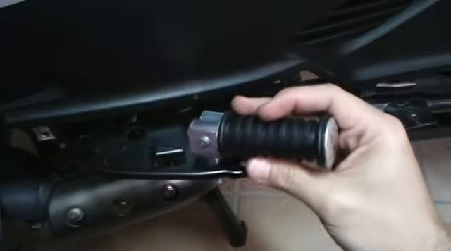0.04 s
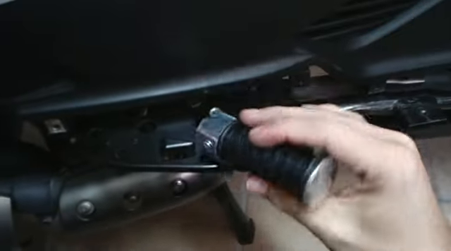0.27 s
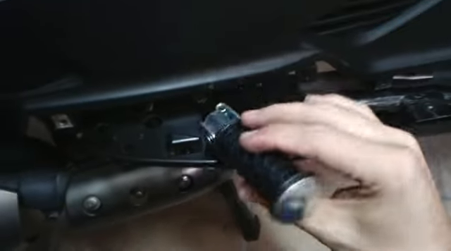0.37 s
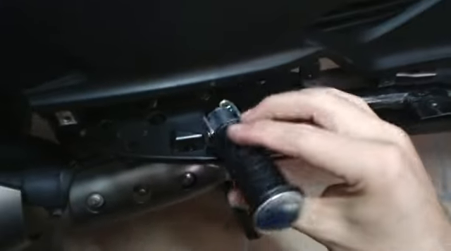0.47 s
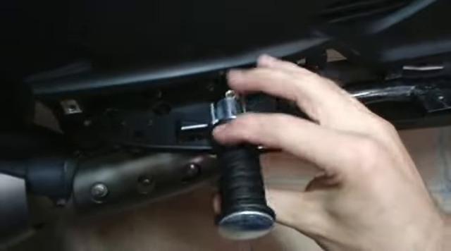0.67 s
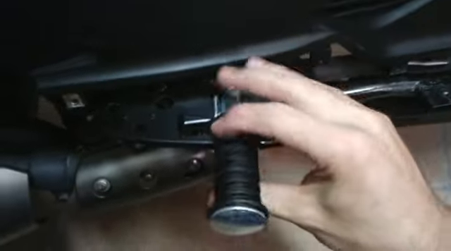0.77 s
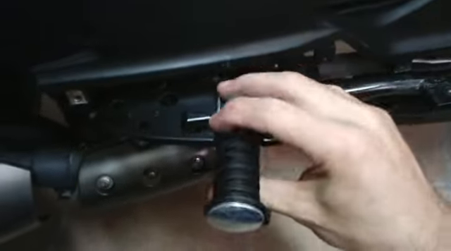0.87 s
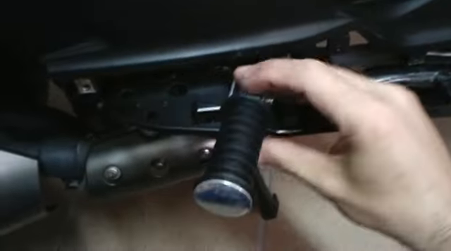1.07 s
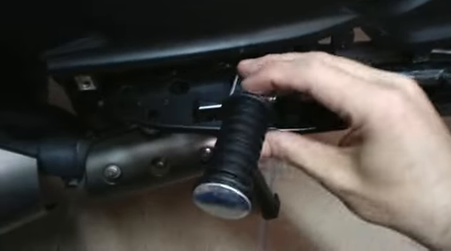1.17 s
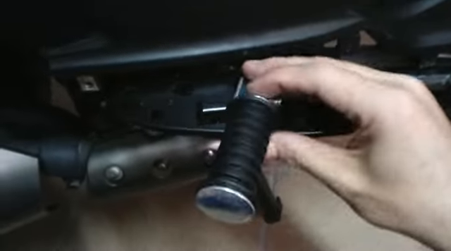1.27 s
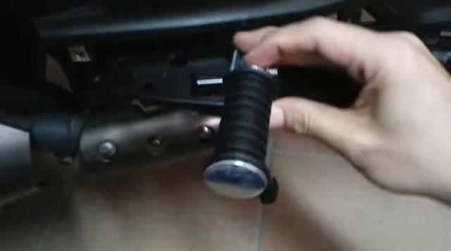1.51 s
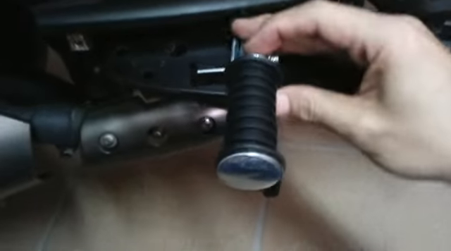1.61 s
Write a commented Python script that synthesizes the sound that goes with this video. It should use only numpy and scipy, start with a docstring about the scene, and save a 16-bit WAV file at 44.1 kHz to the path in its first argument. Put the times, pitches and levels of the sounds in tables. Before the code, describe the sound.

A hand folds out a metal footpeg with a sharp ringing snap and smaller clicks.

```python
"""Scooter footpeg folding out

A small, hard-walled room, one microphone close to the peg, faint hiss behind. A hand swings the
metal peg out: after a thin squeak it snaps against its stop and rings into the room. Then it
clicks and knocks in its hinge as the fingers shift and rub on it."""
import sys
import numpy as np
from scipy import signal
from scipy.fft import rfft, irfft
from scipy.io import wavfile
from scipy.ndimage import uniform_filter1d

SR = 44100
rng = np.random.default_rng(int(sys.argv[2]) if len(sys.argv) > 2 else 0)


def store_wav(level_fs):
    """Save 16-bit WAV to argv[1]."""
    pcm = np.round(np.clip(np.atleast_2d(level_fs), -1, 1) * 32767)
    wavfile.write(sys.argv[1], SR, pcm.T.astype(np.int16))


N = 72765


def amp(db):
    """Decibels to gain."""
    return 10 ** (np.asarray(db) / 20)


def read(points, hz):
    """Interpolates (frequency, value) rows on a logarithmic frequency axis."""
    f, value = np.transpose(points)
    return np.interp(np.log(hz + 1), np.log(f + 1), value)


def add(mix, start_s, sound):
    """Mixes a sound in at a time."""
    part = mix[max(round(start_s * SR), 0):][:len(sound)]
    part += sound[:len(part)]


def axes():
    """Times and frequencies of a one-second sound."""
    return np.arange(SR) / SR, np.fft.rfftfreq(SR, 1 / SR)


def bell(hz, centre, width):
    """A resonance curve of height one."""
    return 1 / (1 + ((hz - centre) / width) ** 2)


def fade(t, t60):
    """Falls by 60 dB in t60."""
    return amp(-60 * t / t60)


def coloured(white, db):
    """Gives white noise of unit power a spectrum in dB per kHz."""
    return irfft(rfft(white) * amp(db), len(white)) * np.sqrt(SR / 2000)


def tick(db):
    """A single minimum-phase impulse with the given spectrum in dB per kHz."""
    cepstrum = irfft(np.log(amp(db)))
    cepstrum[1:SR // 2] *= 2
    cepstrum[SR // 2 + 1:] = 0
    return irfft(np.exp(rfft(cepstrum))) * np.sqrt(SR / 2000)


def ring(modes, t60s, t, rise_s=0.003):
    """Freely dying modes of a struck part."""
    tones = sum(amp(db) * fade(t, read(t60s, hz)) * np.sin(2 * np.pi * (hz * t + rng.random()))
                for hz, db in modes)
    return (1 - np.exp(-t / rise_s)) * tones


# Noise floor at the microphone: f/Hz, level/dB per kHz
HISS_SPECTRUM = [(25, -79.5), (55, -76), (85, -65.5), (115, -69), (220, -62), (450, -66), (900, -68.5),
                 (2000, -73.5), (4500, -76.5), (7800, -81.5)]
def hiss():
    """Steady, faint hiss behind everything."""
    return coloured(rng.standard_normal(N), read(HISS_SPECTRUM, np.fft.rfftfreq(N, 1 / SR)))


# Reverberation of the small room: f/Hz, t60/s
ROOM_T60 = [(60, 0.72), (200, 0.7), (450, 0.57), (1000, 0.45), (2000, 0.43), (4000, 0.33), (8000, 0.32)]
def room_tail(db, rise_s=0.002):
    """Diffuse echo off the hard walls nearby; the treble dies first."""
    t, hz = axes()
    centres, t60s = np.transpose(ROOM_T60)
    spectrum = rfft(coloured(rng.standard_normal(SR), db))
    bands = [irfft(spectrum * read(list(zip(centres, share)), hz)) for share in np.eye(len(centres))]
    return (1 - np.exp(-t / rise_s)) * sum(band * fade(t, t60) for band, t60 in zip(bands, t60s))


# Small parts radiate little bass: f/Hz, gain/dB
BASS_LOSS = [(25, -31.5), (60, -22), (100, -20), (160, -13), (240, -2), (340, -1)]
# Resonances of the frame and bodywork behind the peg: f/Hz, lift/dB
FRAME_RESONANCES = [(232, 5.5), (372, 5), (450, 9.5), (605, 5), (735, 5), (900, 3), (1030, 4.5),
                    (1280, 4.5), (1850, 5.5), (2750, 2.5), (3700, 2.5)]
def frame_colour(hz):
    """Colour in dB of whatever shakes the frame: little bass and hollow resonances in the middle."""
    lift = sum(db * bell(hz, centre, width=0.057 * centre) for centre, db in FRAME_RESONANCES)
    valley = -2.5 * bell(hz, 0, width=FRAME_RESONANCES[-1][0])
    return read(BASS_LOSS, hz) + lift + valley


# Points of a rub's spectrum: f/Hz
RUB_BANDS = [370, 1000, 2500, 6000]
# Rubs of hand and hinge: t/s, length/s, level/dB per kHz at each of RUB_BANDS before the frame's colour
RUB_STROKES = [ (0, .11, -67.5, -65.5, -73.5, -65), (.203, 0.099, -41, -45.5, -73, -64.5),
               (.348, 0.023, -49.5, -47, -74, -80), (.615, 0.0075, -45, -57, -74, -81),
               (0.739, 0.18, -74, -74, -78.5, -75), (1.003, 0.059, -50, -53, -67.5, -74.5),
               (1.06, 0.022, -54, -54.5, -59.5, -76), ]
def rubs(grains_per_s=900, grain_share=0.25, rise_s=0.011):
    """Grainy friction, heard close, while the peg turns or the fingers slide on its grip."""
    out, (t, hz) = np.zeros(N), axes()
    chance = grains_per_s / SR
    for start, length, *colour in RUB_STROKES:
        slips = (rng.random(SR) < chance) * rng.standard_normal(SR) / np.sqrt(chance)
        friction = np.sqrt(grain_share) * slips + np.sqrt(1 - grain_share) * rng.standard_normal(SR)
        level = np.minimum(t / rise_s, 1) * fade(np.maximum(t - length, 0), t60=0.24)
        db = read(list(zip(RUB_BANDS, colour)), hz) + frame_colour(hz)
        add(out, start, level * coloured(friction, db))
    return out


# Glide of the squeak: t/s, f/Hz
SQUEAK_PITCH = [(0, 7560), (.023, 7042), (.057, 6476), (.112, 5900)]
def squeak(level_db=-54, end_s=0.11, edge_s=0.0017, waver_depth=0.54):
    """A thin, wavering whistle that falls in pitch as the peg swings out."""
    t = np.arange(N) / SR
    waver = uniform_filter1d(rng.standard_normal(N), size=200)
    gate = np.clip(np.minimum(t, end_s - t) / edge_s, 0, 1)
    level = amp(level_db) * gate * (1 + waver_depth * waver / waver.std())
    pitch = np.interp(t, *np.transpose(SQUEAK_PITCH))
    return level * np.sin(2 * np.pi * np.cumsum(pitch) / SR)


# Modes of the hinge bracket: f/Hz, relative level/dB
BRACKET_MODES = [ (232, -8), (368, -2), (453, -1), (753, -7), (930, -5), (997, -6), (1067, -7), (1303, 1),
                 (2222, -7), (5448, -4), (6078, -3), ]
# Ring time of the bracket: f/Hz, t60/s
BRACKET_DECAY = [(300, .28), (1300, .31), (6000, .19)]
# Points of a click's spectrum: f/Hz
CLICK_BANDS = [370, 900, 1700, 3600, 5300, 7300]
# Blows in the hinge: t/s, level/dB per kHz at each of CLICK_BANDS before ping and frame colour,
# clatter t60/s, room gain/dB, ping f/Hz, ping lift/dB, bracket gain/dB
HINGE_BLOWS = [ (0.2162, -53, -50.5, -55, -77.5, -57.5, -72, 0.05, 5.5, 5040, 2.4, -74),
               (0.2344, -53.5, -33.5, -35, -33.5, -24, -29, 0.023, -21, 5300, 9.8, -56),
               (0.2381, -37, -29.5, -26.5, -27, -27, -30.5, 0.067, -13, 5200, 2.9, -52.5),
               (0.389, -45, -51.5, -62.5, -56, -58, -70, 0.13, -4.5, 420, 1.3, -64),
               (.4795, -44, -45.5, -45.5, -46.5, -57.5, -57.5, 0.091, -5, 6100, 5.9, -46),
               (0.584, -46, -48.5, -51, -56.5, -71, -65, 0.057, -7.5, 720, 1.5, -66),
               (.5975, -42.5, -37, -47, -49, -62, -65.5, 0.05, -10, 4500, 9.9, -51),
               (0.6829, -49.5, -46, -52.5, -56.5, -70.5, -61, 0.23, -15, 8200, 3.5, -51.5),
               (0.7, -50.5, -67, -44.5, -67, -63.5, -83, 0.027, -15.5, 5030, 5.6, -58),
               (.954, -47, -58, -63.5, -62, -76, -67, 0.019, -24, 1400, 6, -84),
               (.998, -68, -57, -58.5, -66, -65.5, -69, 0.086, -5, 5640, 3.7, -66),
               (1.0356, -65.5, -56, -67, -70, -56, -62.5, 0.018, -23, 6700, 15, -71),
               (1.0507, -43.5, -63, -44.5, -48, -42.5, -52.5, 0.043, -14, 4480, 8.6, -57),
               (1.119, -61, -44.5, -45, -51, -53, -56, 0.074, -9, 700, 4.7, -59.5),
               (1.262, -50, -59, -58.5, -68, -74, -75, 0.043, -9, 1100, 1.2, -65),
               (1.324, -57, -59, -79, -76, -67, -78, 0.085, -11, 4750, 6.9, -77), ]
def hinge_clicks(tick_s=0.0011, ring_follow=0.5, pivot_hz=1310):
    """Metal meets metal close by: a tick and clatter with one ping, the bracket's ring, then the room."""
    out, (t, hz) = np.zeros(N), axes()
    for start, *colour, t60, room_db, ping_hz, ping_db, bracket_db in HINGE_BLOWS:
        blow_db = read(list(zip(CLICK_BANDS, colour)), hz) + ping_db * bell(hz, ping_hz, width=270)
        db = blow_db + frame_colour(hz)
        force = rng.standard_normal(SR) * fade(t, t60)
        force[0] = np.sqrt(tick_s * SR)  # first impact: the energy of tick_s of undamped clatter
        contact = signal.fftconvolve(force, tick(db))[:SR]
        # the bracket's modes partly follow the colour of each blow
        tilt_db = ring_follow * (blow_db - np.interp(pivot_hz, hz, blow_db))
        modes = [(f, level + np.interp(f, hz, tilt_db)) for f, level in BRACKET_MODES]
        bracket = amp(bracket_db) * ring(modes, BRACKET_DECAY, t)
        add(out, start, contact + bracket + amp(room_db) * room_tail(db))
    return out


# Modes of the footpeg: f/Hz, relative level/dB
FOOTPEG_MODES = [ (824, -7), (1038, -4), (1059, -1), (1274, -7), (1495, -9), (1823, -4), (1863, -9),
                 (2011, -7), (2208, -6), (2670, -4), (2714, -6), (3065, -11), (3424, -7), (3467, -6),
                 (3681, -5), (3960, 2), (3985, -3), (4678, -8), (5018, -1), (5049, 2), (5224, -7),
                 (5440, -6), (5510, -4), (5895, -4), (6361, -4), (6428, -4), (7267, -5), (7930, -10), ]
# Ring time of the footpeg: f/Hz, t60/s
FOOTPEG_DECAY = [(1000, 0.6), (4000, 0.41), (8000, 0.43)]
def peg_ring(start_s=0.236, ring_gain_db=-39.5, echo_gain_db=-24):
    """Hitting its stop sets the whole peg ringing, and its resonances fill the room."""
    out, (t, hz) = np.zeros(N), axes()
    power = sum(amp(db) ** 2 * bell(hz, centre, width=15) for centre, db in FOOTPEG_MODES)
    echo = room_tail(echo_gain_db + 10 * np.log10(power) + read(BASS_LOSS, hz))
    direct = amp(ring_gain_db) * ring(FOOTPEG_MODES, FOOTPEG_DECAY, t)
    add(out, start_s, direct + echo)
    return out


def scene():
    """Peg, hand and room at one close microphone."""
    return (hinge_clicks() + peg_ring() + rubs() + squeak() + hiss())[None]


def record(dry):
    """The recorder's band limit cuts the treble above about 8 kHz."""
    lowpass = signal.firwin(501, 8010, window=("kaiser", 7), fs=SR)
    return signal.oaconvolve(dry, lowpass[None], "same")


dry = scene()
out = record(dry)
store_wav(out)
```